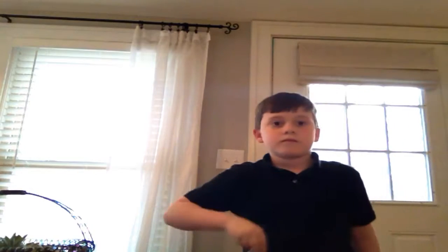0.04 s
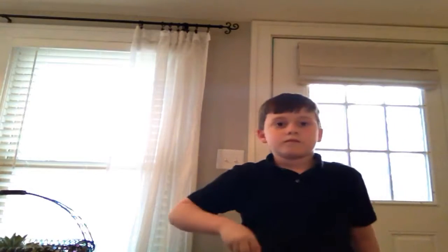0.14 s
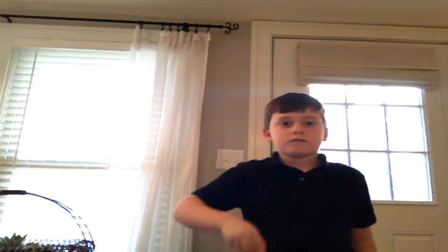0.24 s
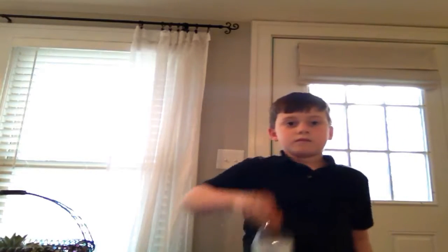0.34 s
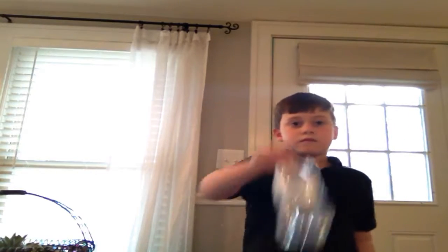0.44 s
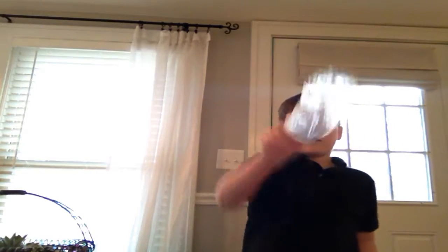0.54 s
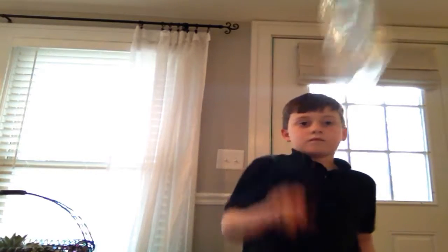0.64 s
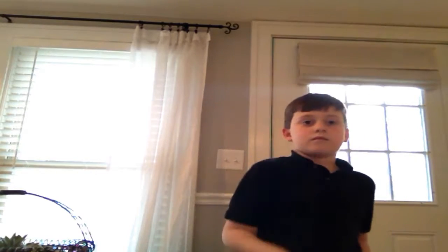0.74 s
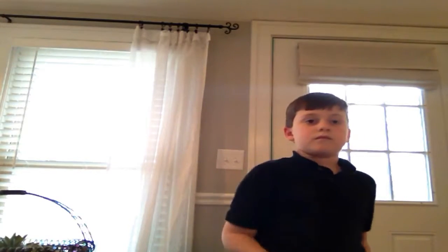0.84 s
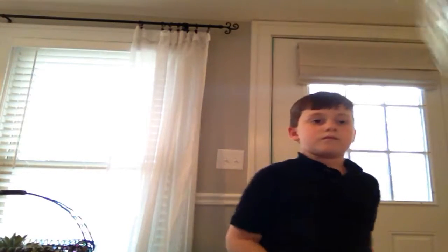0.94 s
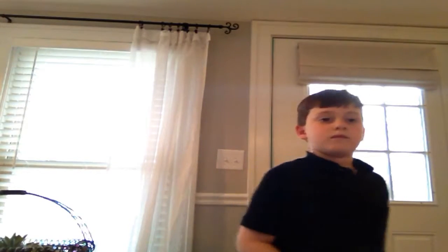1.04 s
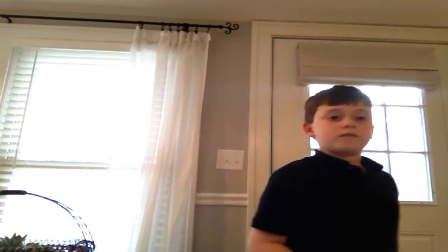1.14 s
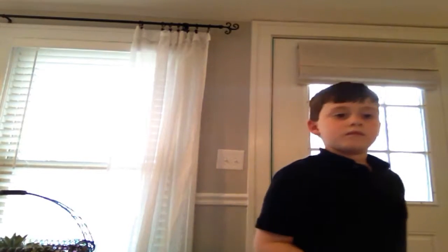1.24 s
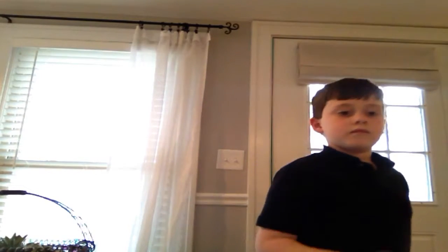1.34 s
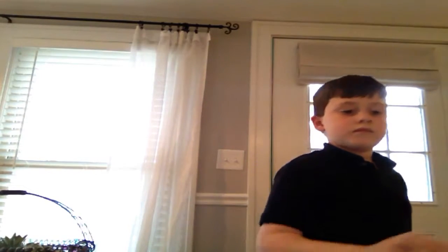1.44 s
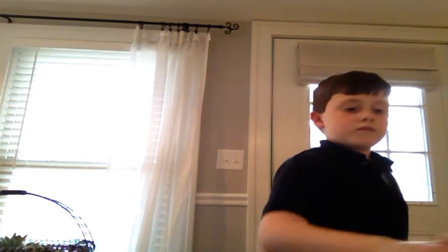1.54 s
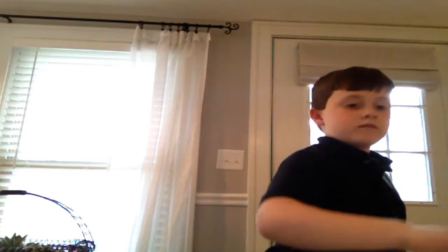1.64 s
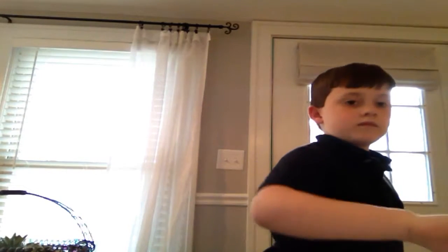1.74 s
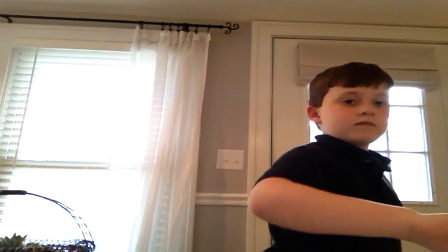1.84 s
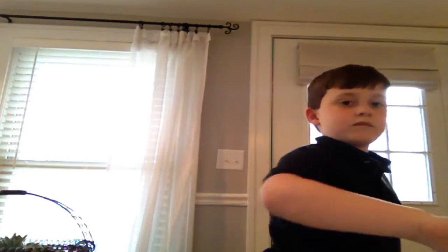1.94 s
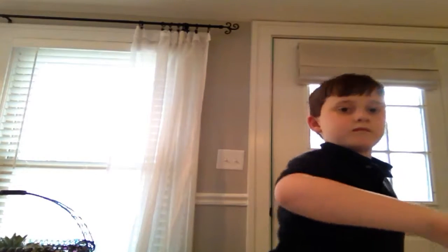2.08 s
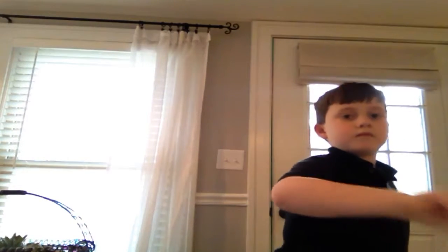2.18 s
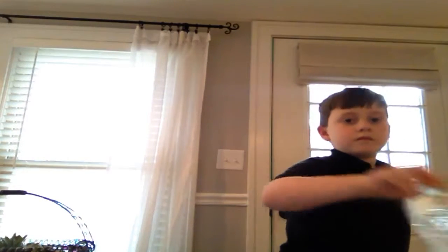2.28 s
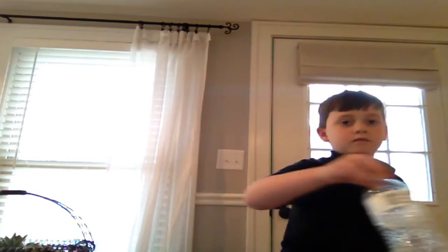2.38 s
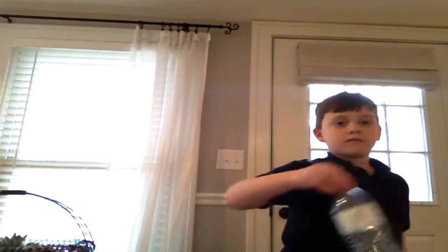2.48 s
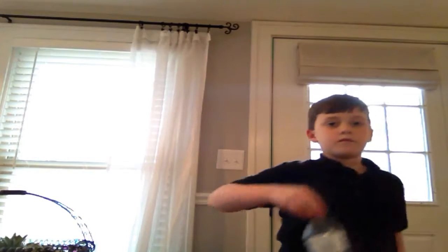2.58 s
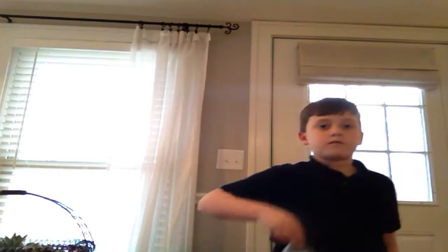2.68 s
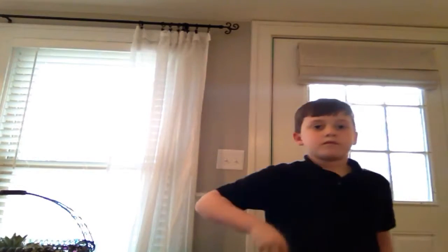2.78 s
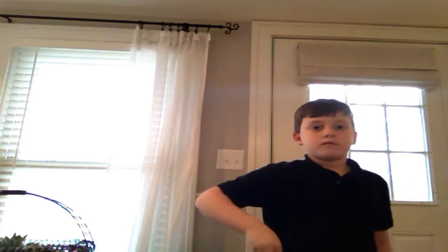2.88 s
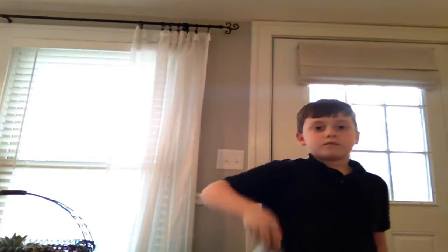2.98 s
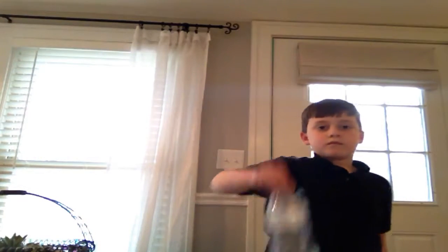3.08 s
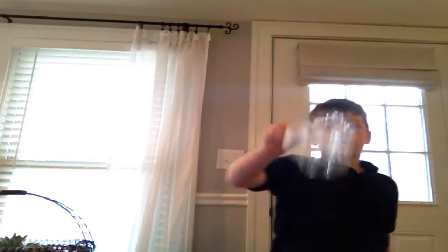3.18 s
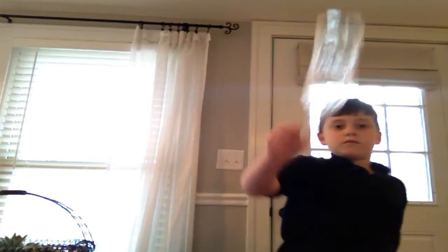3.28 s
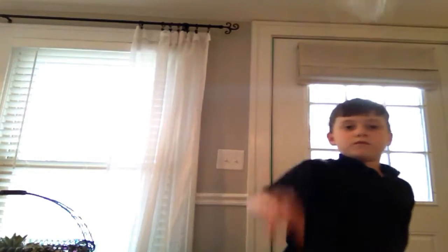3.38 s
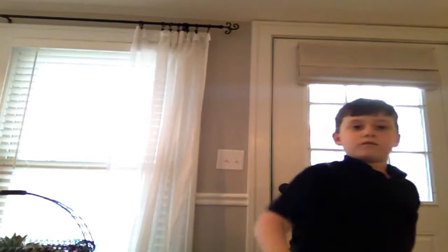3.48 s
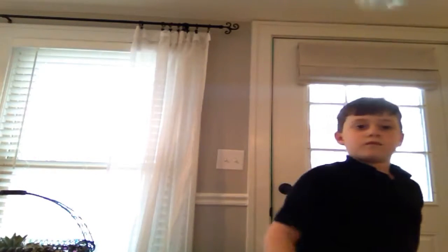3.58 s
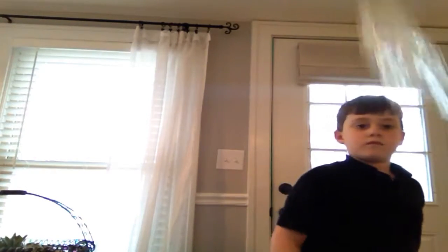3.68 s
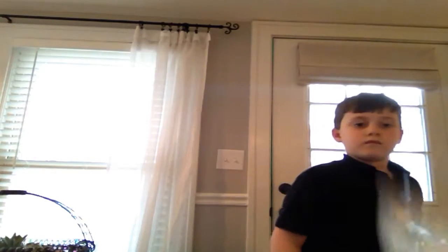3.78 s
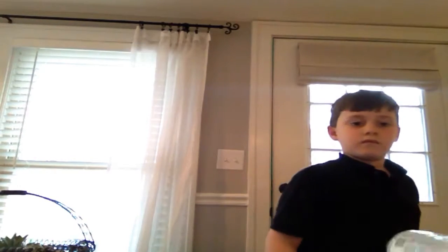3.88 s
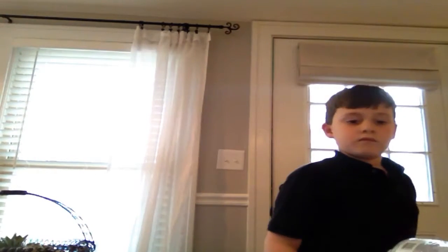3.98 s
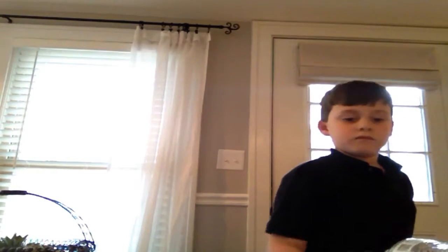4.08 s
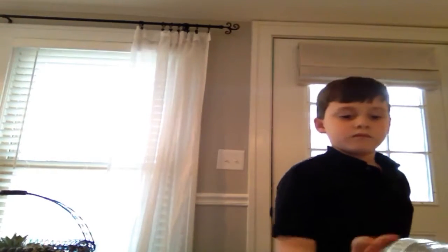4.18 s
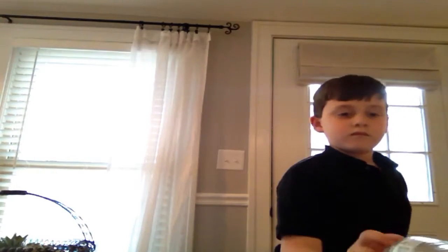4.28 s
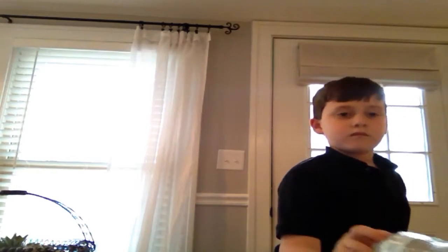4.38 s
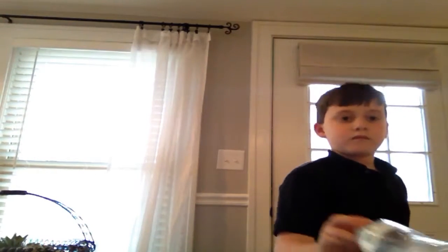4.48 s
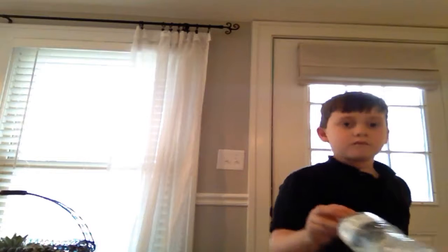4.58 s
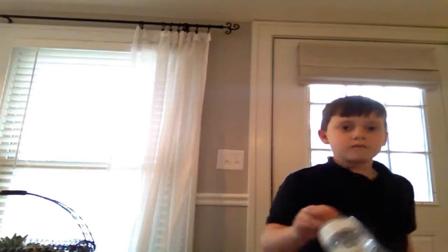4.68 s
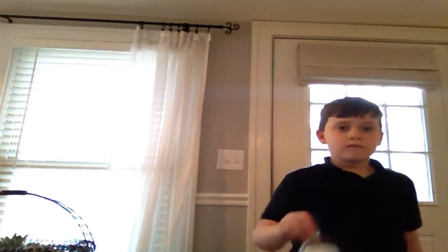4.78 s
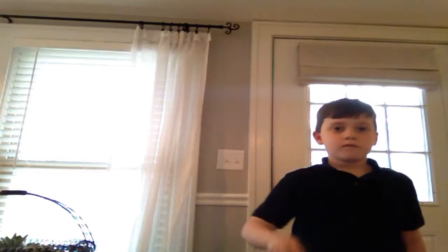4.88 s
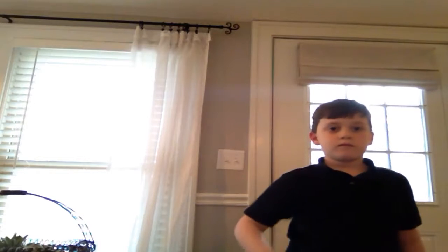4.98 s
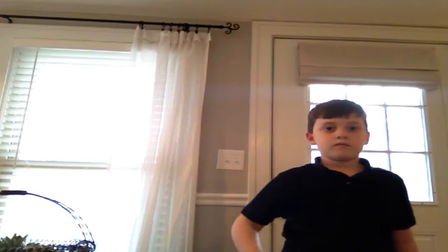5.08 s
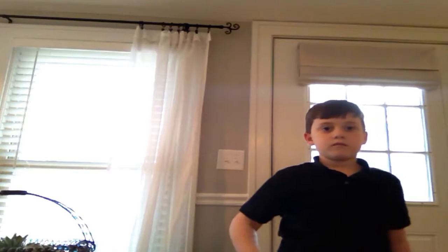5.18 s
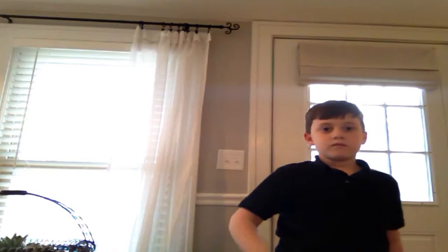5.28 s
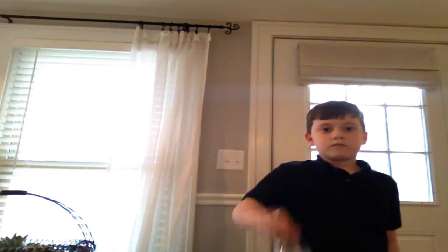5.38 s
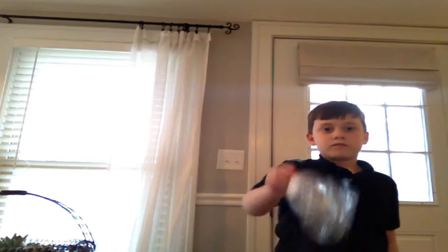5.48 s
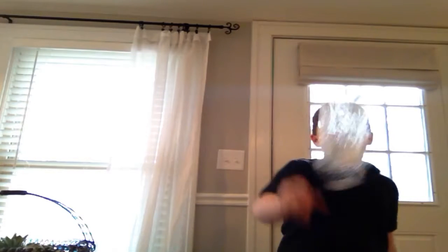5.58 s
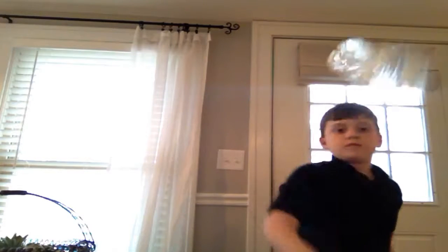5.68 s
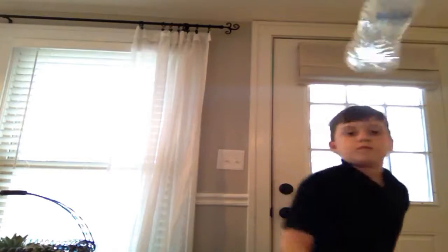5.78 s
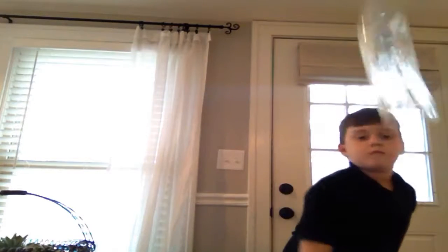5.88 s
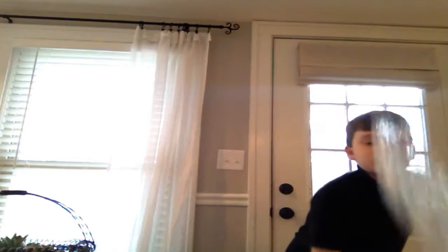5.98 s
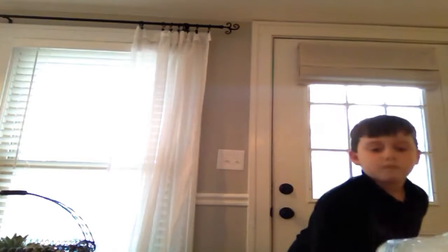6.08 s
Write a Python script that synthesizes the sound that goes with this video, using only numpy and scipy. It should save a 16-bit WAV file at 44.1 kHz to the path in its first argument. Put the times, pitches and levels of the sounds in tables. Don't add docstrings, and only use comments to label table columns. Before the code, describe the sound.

A laptop microphone nearby picks up bottle flipping at a wooden table. A soft double slosh comes first, then a very loud, short thump and plastic crack with a lighter rebound. Quiet crinkling and drop ticks lead to a second clattering hit, then gentle rubbing and a third knock. Short bright room echoes follow each blow over a low, faint hum.

```python
import sys
import numpy as np
from scipy import signal
from scipy.fft import rfft, irfft, next_fast_len
from scipy.io import wavfile
from scipy.ndimage import uniform_filter1d

SR = 44100
rng = np.random.default_rng(int(sys.argv[2]) if len(sys.argv) > 2 else 0)


def dump_mix(stems):
    frames = np.atleast_2d(stems).T
    limited = np.clip(frames, -1, 1)
    pcm = np.round(limited * 32767).astype(np.int16)
    wavfile.write(sys.argv[1], SR, pcm)


def invert_db(x):
    u = np.asarray(x, float) / 20
    return 10 ** u


N = 270333

# t/s, table thump level/dB, wall buckle level/dB,
# crack level/dB, contact length t/s
LANDINGS = [(0.998, -2.5, -3.5, -5.5, 0.00087), (1.001, -9, -10, -4.5, 0.0024),
            (1.006, -7.5, -12.5, -12.5, 0.0042), (1.286, -21, -25.5, -20.5, 0.0064),
            (1.293, -18, -24.5, -15, 0.0027), (1.338, -28, -30, -55, 0.0031), (1.349, -32, -35, -48, 0.003),
            (3.719, -9, -9.5, -8, .008), (3.724, -10, -21, -11.5, .0032), (3.751, -13, -12.5, -5.5, .0046),
            (3.758, -14, -12.5, -20, 0.004), (3.77, -8.5, -18, -13.5, 0.0032), (5.952, -12, -11, -14, .008),
            (5.957, -21, -23, -14.5, 0.009), (6.0125, -17.5, -24.5, -11.5, 0.0024),
            (6.121, -34, -38, -28.5, 0.0022), (3.874, -31, -24.5, -26.5, 0.0069),
            (3.896, -25, -28, -29.5, 0.008), (3.93, -27, -41.5, -47.5, 0.0086),
            (6.032, -25.5, -26, -19.5, .0021), (1.0086, -7, -18, -24.5, .003),
            (5.962, -10.5, -21.5, -22, 0.0037), (6.0108, -15, -28, -17, 0.0018),
            (5.982, -11.5, -33, -36, 0.0031)]
# f/Hz, level/dB, time to die by 60 dB t/s
TABLE_MODES = [(150, -16.5, .15), (153, -14.5, 0.11), (193.5, -19, 0.062), (251, -10.5, 0.11),
               (314, -7, 0.033), (342, -2.5, .1), (381, -2.5, 0.14), (426, 1, 0.065), (452, -2, 0.091),
               (508, 0.5, 0.14), (541.6, -1, 0.13), (580, -8.5, 0.23), (640, -7.5, 0.22), (688, -16, 0.09),
               (694, -4.5, .1), (751, -7.5, 0.11), (827, -10, 0.055), (854, -10, 0.066)]
# f/Hz, level/dB, time to die by 60 dB t/s
WALL_MODES = [(960, -3.5, 0.0069), (1173, 5.5, 0.0044), (1362, -4, 0.015), (1700, -5, 0.01176),
              (1806, -1, 0.008), (2160, -1.5, 0.0042), (2440, -3.5, 0.0038), (2560, -9.5, 0.0045)]
# f/Hz, level/dB
CRACK_COLOUR = [(1470, -36), (2500, -2), (3800, 0.5), (6550, -8.5), (7590, -7.5), (8940, -10.5),
                (15000, -12), (16000, -41.5)]


def landings(room):
    out = np.zeros(N)
    ring_size = SR // 3
    t = np.arange(1024) / SR
    for s, thump_db, wall_db, crack_db, length in LANDINGS:
        push = np.minimum(t / 0.00095, 1) * np.exp(-t / min(length, 0.008))
        rough = rng.standard_normal(1024) * np.abs(rng.standard_normal(1024)) ** 0.5
        spectrum = rfft(push * rough)
        slips = irfft(spectrum / np.abs(spectrum)) * push ** 0.25
        thump = signal.fftconvolve(ring(TABLE_MODES, ring_size, 1), slips)
        buckle = signal.fftconvolve(ring(WALL_MODES, ring_size // 8, -1.143), slips)
        crack = shaped(np.pad(slips, (256, 256)), CRACK_COLOUR)[256:]
        for part, part_db in ((thump, thump_db), (buckle, wall_db), (crack, crack_db)):
            add(out, s, room(peak(part, part_db)))
    return out


def ring(modes, size, sign):
    hz, db, t60 = (column[:, None] for column in np.transpose(modes))
    t = np.arange(size) / SR
    pitch_luck, level_luck = rng.standard_normal((2, len(modes), 1))
    tone = np.sin(2 * np.pi * hz * (1 + 0.015 * pitch_luck) * t) * 1000 ** (-t / t60)
    strength = invert_db(db + 2.0 * level_luck) * sign ** np.arange(len(modes))[:, None]
    return (strength * tone).sum(axis=0)


# t/s, peak level/dB, f/Hz, time to die by 60 dB t/s
SHORT_RINGS = [(1.002, -7.5, 2026, .014), (1.288, -14.5, 843, 0.012), (2.039, -34, 633, .028),
               (4.705, -55.5, 2363, 0.061), (5.487, -38.5, 4090, 0.025), (5.488, -46.5, 5780, 0.04),
               (5.491, -41, 3390, 0.026), (5.51, -53, 1980, .05), (5.508, -45.5, 4150, 0.068),
               (5.54, -50, 4050, 0.063), (5.954, -19, 1770, .012), (1.294, -27, 4320, 0.0077),
               (1.006, -8, 537, 0.058), (5.51, -61, 5800, .05), (6.015, -16, 4720, .008),
               (6.015, -18.5, 2150, 0.017)]


def short_rings(room):
    out = np.zeros(N)
    for s, db, hz, t60 in SHORT_RINGS:
        add(out, s, room(tick(db, hz, t60, click_db=-7)))
    return out


# peak t/s, rise t/s, fall t/s, level/dB, brightest f/Hz; rise and fall span 20 dB
HAND_STROKES = [(.05, 0.15, 0.18, -64, 4400), (.46, 0.12, 0.24, -79, 2470), (.89, 0.31, .15, -66, 3020),
                (1.489, 0.18, .2, -55.5, 1505), (1.67, .06, .35, -67, 4000),
                (2.06, 0.06, 0.21, -52.5, 1100), (2.17, 0.05, 0.34, -56, 2770),
                (2.28, 0.059, 0.07, -61.5, 8000), (2.06, .04, 0.067, -65, 11000),
                (2.46, 0.26, .12, -61, 1490), (2.54, .05, .2, -68.5, 4000), (3.145, 0.032, .13, -56, 3010),
                (3.45, 0.21, .3, -68, 1300), (3.649, 0.093, .3, -51.5, 1490), (4.02, 0.28, 0.1, -51, 2000),
                (4.2, 0.3, 0.7, -62.5, 2520), (4.47, 0.18, .3, -58.5, 3170),
                (4.885, 0.033, .14, -59.5, 3470), (5.069, .15, .4, -67.5, 1000),
                (5.5, 0.084, 0.072, -53, 2500), (5.6, .1, 0.26, -69.5, 3000), (5.769, .04, 0.25, -65, 3030),
                (.63, .05, .12, -65, 2364)]
# peak t/s, rise t/s, fall t/s, level/dB, brightest f/Hz
WATER_SURGES = [
    (.186, 0.016, 0.15, -47, 9000),
    (.222, 0.045, 0.13, -44.5, 5200),
    (.328, 0.032, 0.15, -44.5, 8100),
    (.348, 0.075, 0.31, -49, 2206),
    (.35, .05, 0.14, -50.5, 4900),
    (.23, .08, .2, -56, 800),
]


def handling():
    out, t = np.zeros(N), np.arange(N) / SR
    strokes = HAND_STROKES + WATER_SURGES
    swells = []
    for s, rise, fall, db, _ in strokes:
        distance = np.maximum((s - t) / rise, (t - s) / fall)
        swells.append(invert_db(db - 20 * distance) ** 2)
    brightest_hz = np.array(strokes)[:, -1]
    layers = [(648, 1410, 0.9), (1480, 3300, 0.9), (3900, 5920, 0.9), (5760, 10500, 0.9),
              (10500, 16500, 0.8)]
    duller_db_oct, brighter_db_oct = 4.5, 8.5
    for lo_hz, hi_hz, grain_db in layers:
        grains = invert_db(grain_db * np.repeat(rng.exponential(size=N // 64 + 1), 64)[:N])
        noise = unit(band(rng.standard_normal(N) * grains, lo_hz, hi_hz))
        octaves = np.log2(np.sqrt(lo_hz * hi_hz) / brightest_hz)
        loss_db = np.maximum(brighter_db_oct * octaves, -duller_db_oct * octaves)
        share = invert_db(-loss_db) ** 2
        out += noise * np.sqrt(share @ swells)
    return out


# t/s, peak level/dB, f/Hz
CRINKLE_SNAPS = [(2.037, -41.5, 1570), (2.057, -48, 3500), (2.075, -37, 1630), (2.075, -56, 3200),
                 (2.097, -33.5, 3030), (2.1, -31.5, 1680), (2.156, -48, 3420), (2.270, -47, 5120),
                 (2.302, -59, 7600), (4.029, -41, 4170), (4.036, -42, 3800), (4.05, -43, 3050),
                 (4.165, -47, 3100), (4.441, -42, 4370), (4.569, -50, 3840), (5.473, -46, 1490),
                 (5.472, -43.5, 2700), (5.485, -34, 2600), (5.491, -46, 8300)]


def crinkles(room):
    out = np.zeros(N)
    for s, db, hz in CRINKLE_SNAPS:
        add(out, s, room(tick(db, hz, t60=0.02, click_db=2)))
    return out


# t/s, peak level/dB, f/Hz
DROP_TICKS = [(0.462, -41, 3840), (0.477, -43, 4670), (0.841, -49.5, 3060), (0.891, -48.5, 5840),
              (1.679, -49.5, 3000), (2.222, -53, 6960), (2.529, -54, 2270), (3.137, -47, 3800),
              (3.15, -47.5, 4700), (3.174, -50.5, 4800), (3.437, -57, 2780), (3.480, -50.5, 5070),
              (3.525, -51.5, 5200), (3.525, -56, 3240), (3.602, -53.5, 3300), (3.604, -51, 6500),
              (3.924, -35, 6440), (4.407, -47, 1200), (4.430, -40, 3940), (4.494, -46, 3820),
              (4.515, -50, 1520), (4.533, -50, 7830), (4.874, -53.5, 3824), (5.448, -44.5, 3750),
              (5.761, -52.5, 3220), (5.781, -45.5, 5740), (5.878, -48, 2780), (5.936, -50.5, 2300)]


def drops(room):
    out = np.zeros(N)
    for s, db, hz in DROP_TICKS:
        add(out, s, room(tick(db, hz, t60=0.012, click_db=-9.5)))
    return out


def tick(db, hz, t60, click_db):
    t = np.arange(4096) / SR
    tone = np.minimum(t / 0.0004, 1) * np.sin(2 * np.pi * hz * t) * 1000 ** (-t / t60)
    burst = rng.standard_normal(4096) * np.exp(-t / 0.001)
    click = peak(band(burst, hz / 1.6, min(hz * 2.2, 15000)), click_db)
    return peak(tone + click, db)


# f/Hz, time to die by 60 dB t/s, echo level/dB
ROOM_ECHOES = [(135, 0.17, -6), (270, 0.51, -5), (510, 0.31, -6), (926, 0.36, -5.5), (1940, 0.31, -8),
               (3760, 0.42, -8), (8100, 0.27, -5), (14200, 0.049, -8.5)]


def hard_walls():
    t = np.arange(2 * SR // 3) / SR
    hz, t60, db = (column[:, None] for column in np.transpose(ROOM_ECHOES))
    noise = np.array([unit(band(rng.standard_normal(SR), f / 1.5, min(f * 1.397, 20000)))
                      for f in hz[:, 0]])
    build_up = np.clip((t - 0.003) / 0.0076, 0, 1)
    fade = invert_db(db - 76.5) * np.sqrt(hz / t60) * 1000 ** (-t / t60) * build_up

    def room(x):
        start = rng.integers(SR - len(t))
        echoes = (noise[:, start:start + len(t)] * fade).sum(axis=0)
        echoes[0] = 1
        return signal.fftconvolve(x, echoes)
    return room


# f/Hz, level/dB, width f/Hz
FRIDGE_HUM = [(69, -85, 8), (120, -67, 6), (144, -58, 20), (240, -50, 14), (288, -64, 10), (360, -62, 10),
              (480, -61, 10)]
# f/Hz, level/dB
AIR_COLOUR = [(18, -75), (30, -46.5), (70, -33.5), (124, -25), (184, -12.5), (210, -16), (239, -2.5),
              (295, -15.5), (426, -13), (486, -15.5), (632, -23.5), (702, -22.5), (2290, -36),
              (14800, -39.5), (16000, -42.5)]


def background():
    out = unit(shaped(rng.standard_normal(N), AIR_COLOUR)) * invert_db(-54)
    t = np.arange(N) / SR
    for hz, db, width in FRIDGE_HUM:
        k = max(int(SR / width), 2)
        a, b = (unit(uniform_filter1d(uniform_filter1d(rng.standard_normal(N), k), k)) for _ in range(2))
        waver = 1.495 + 0.28 * (a + 1j * b)
        out += invert_db(db - 1.3) * np.imag(waver * np.exp(2j * np.pi * hz * t))
    return out


def shaped(x, points):
    hz, db = np.transpose(points)
    size = next_fast_len(len(x))
    f = np.maximum(np.arange(size // 2 + 1) * SR / size, 1)
    gain = invert_db(np.interp(np.log(f), np.log(hz), db))
    return irfft(rfft(x, size) * gain, size)[:len(x)]


def unit(x):
    return x / np.sqrt(np.mean(x ** 2))


def band(x, lo_hz, hi_hz):
    return signal.sosfilt(signal.butter(2, [lo_hz, hi_hz], "band", fs=SR, output="sos"), x)


def add(out, s, x):
    i = int(s * SR)
    out[i:i + len(x)] += x[:N - i]


def peak(x, db):
    return x * invert_db(db) / np.abs(x).max()


def scene():
    room = hard_walls()
    no_bass = signal.butter(4, 140, "high", fs=SR, output="sos")
    bottle = landings(room) + short_rings(room) + crinkles(room) + drops(room)
    return (signal.sosfilt(no_bass, bottle) + handling() + background())[None]


def top_cut(x):
    return signal.sosfilt(signal.butter(12, 16810, fs=SR, output="sos"), x)


def record(dry):
    x = np.tanh(0.9 * dry) / 0.9
    x = signal.sosfilt(signal.butter(2, 55, "high", fs=SR, output="sos"), x)
    x = signal.sosfilt(signal.ellip(7, 0.3, 32, 15750, fs=SR, output="sos"), x)
    return top_cut(x)


dry = scene()
out = record(dry)
dump_mix(out)
```